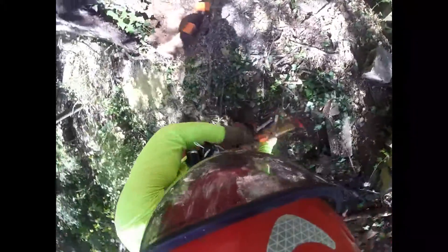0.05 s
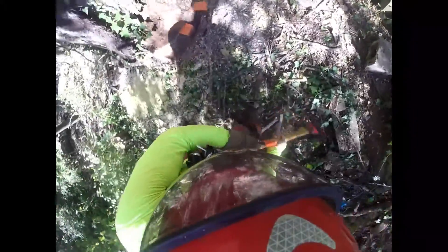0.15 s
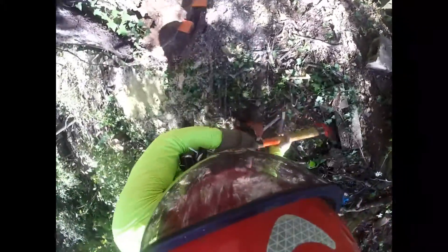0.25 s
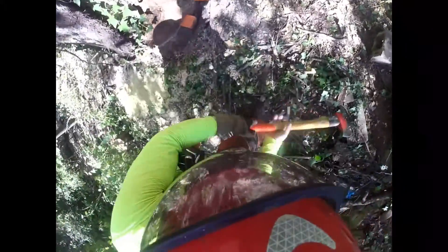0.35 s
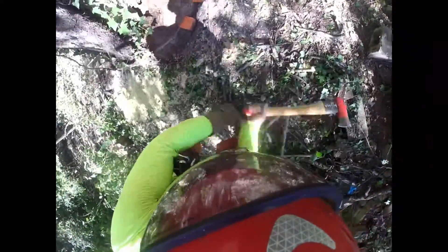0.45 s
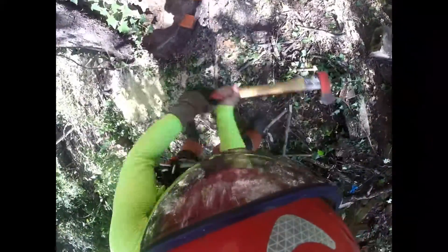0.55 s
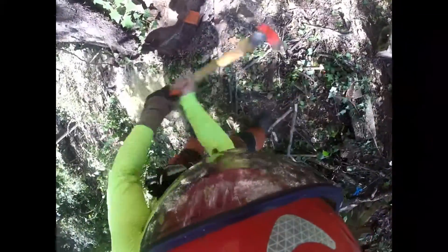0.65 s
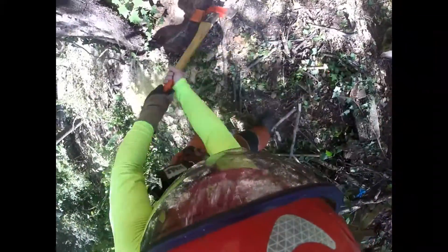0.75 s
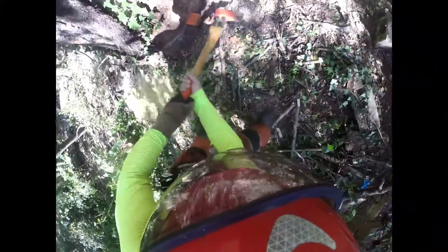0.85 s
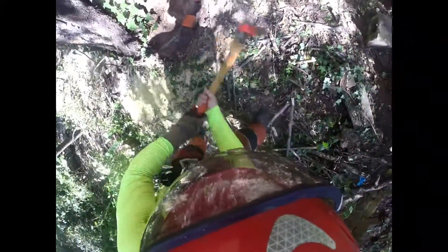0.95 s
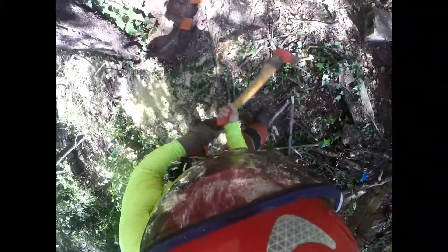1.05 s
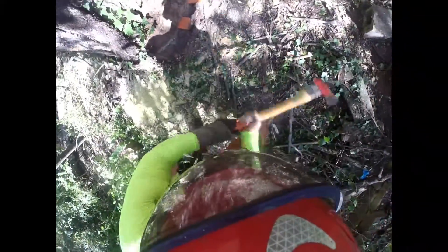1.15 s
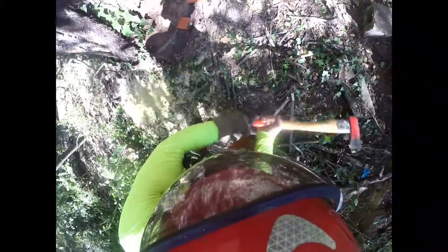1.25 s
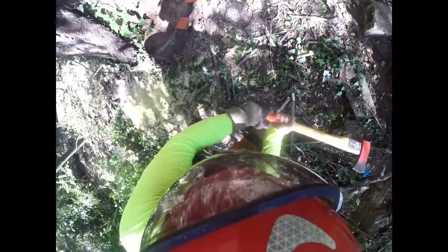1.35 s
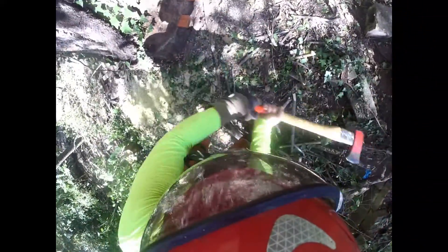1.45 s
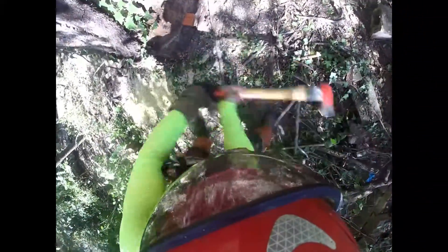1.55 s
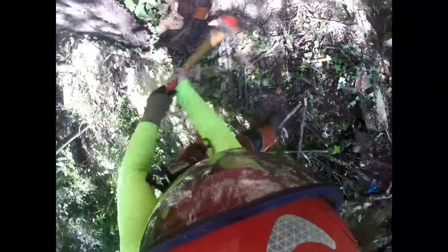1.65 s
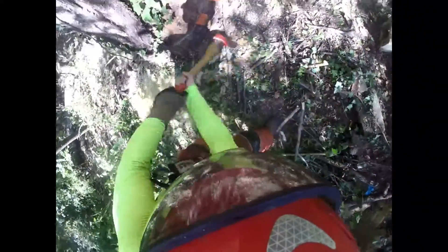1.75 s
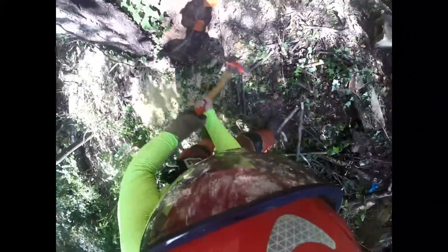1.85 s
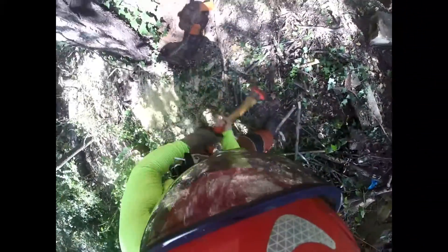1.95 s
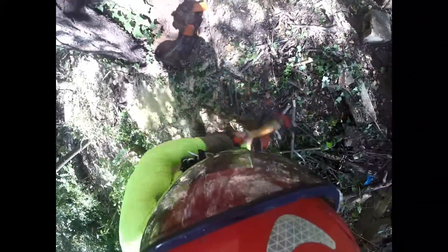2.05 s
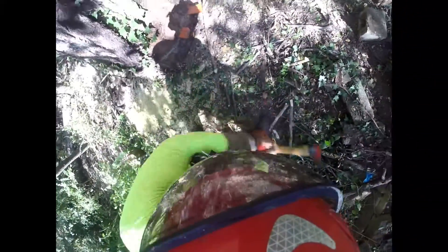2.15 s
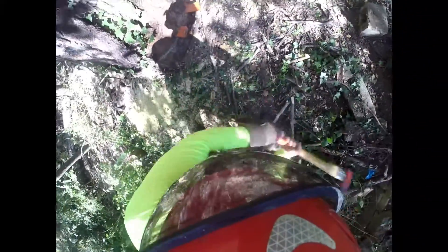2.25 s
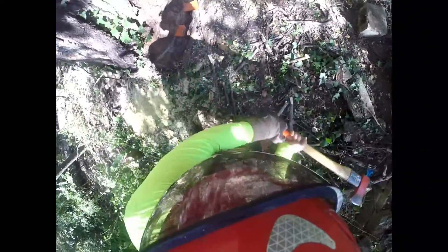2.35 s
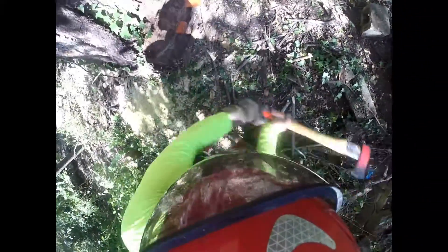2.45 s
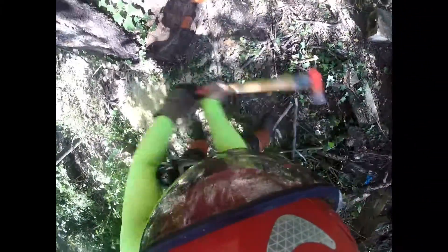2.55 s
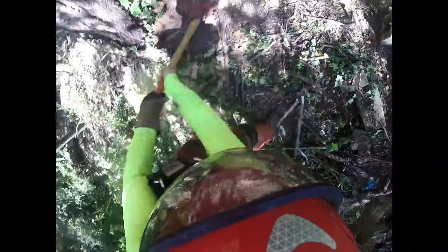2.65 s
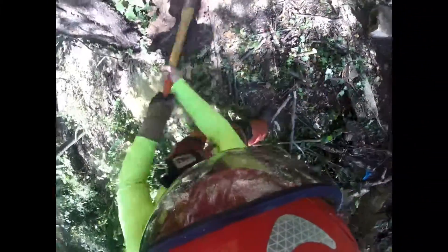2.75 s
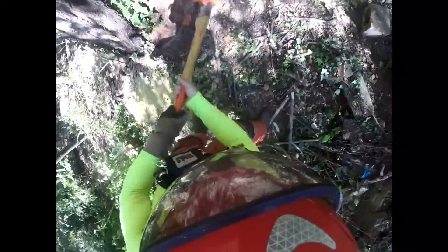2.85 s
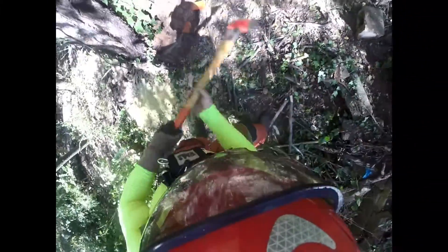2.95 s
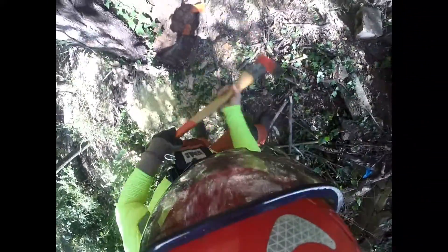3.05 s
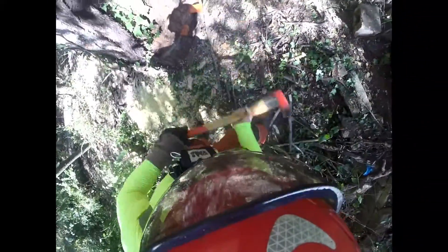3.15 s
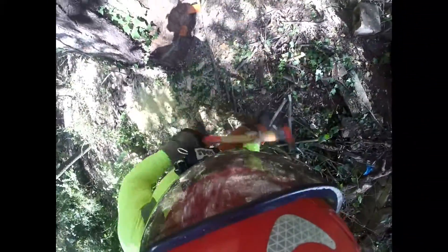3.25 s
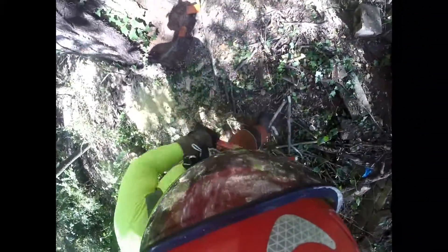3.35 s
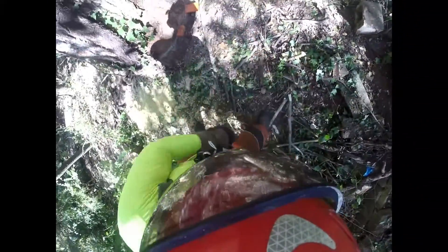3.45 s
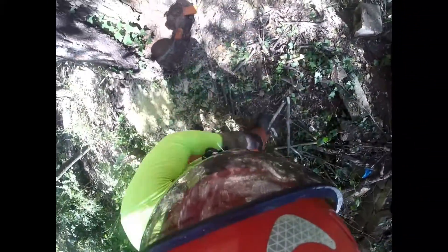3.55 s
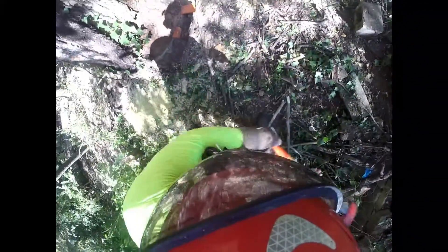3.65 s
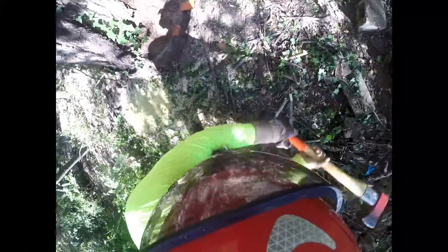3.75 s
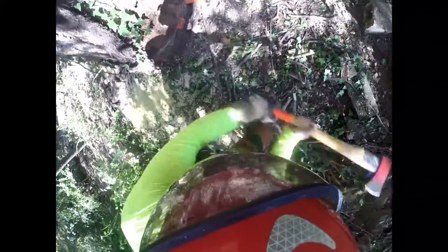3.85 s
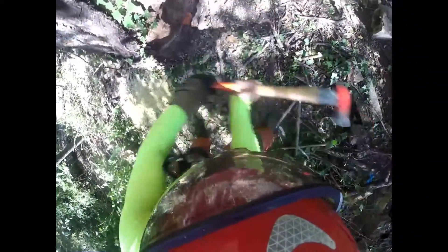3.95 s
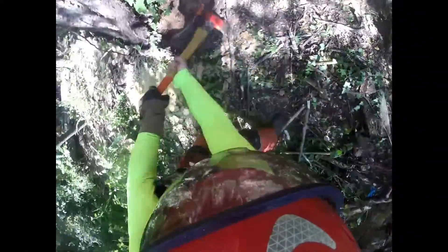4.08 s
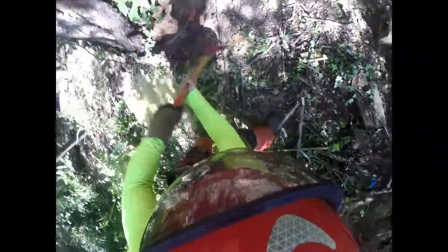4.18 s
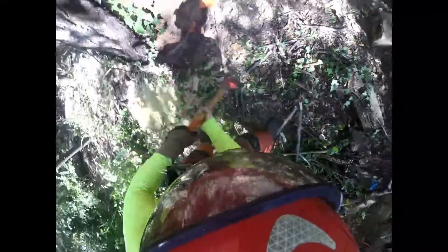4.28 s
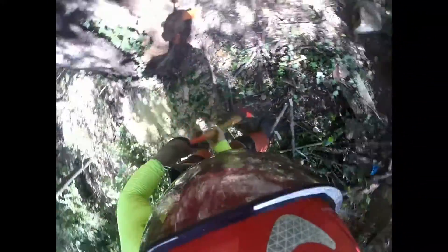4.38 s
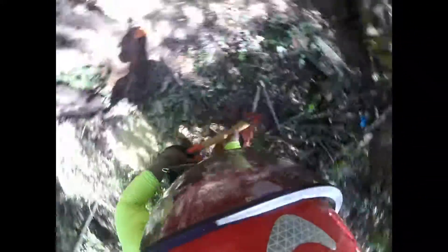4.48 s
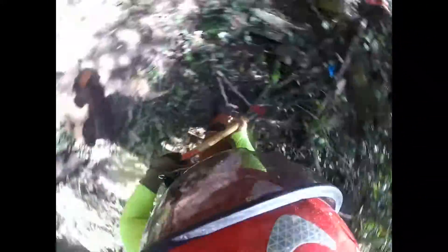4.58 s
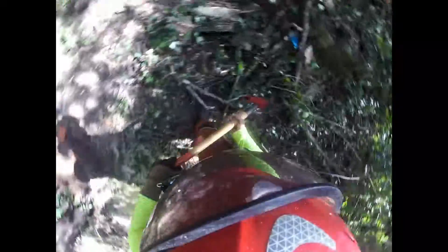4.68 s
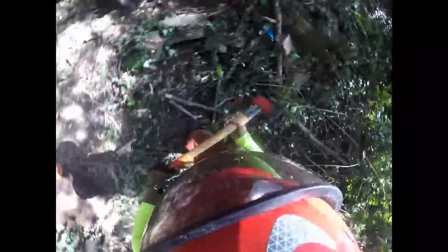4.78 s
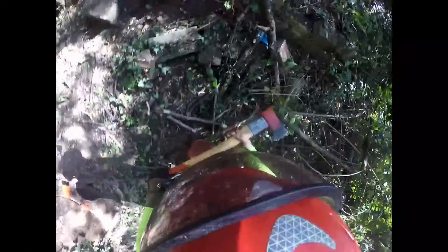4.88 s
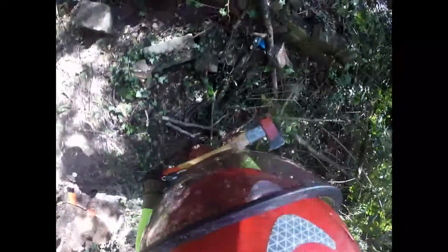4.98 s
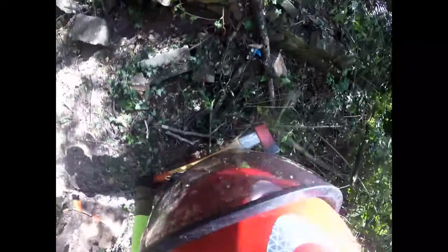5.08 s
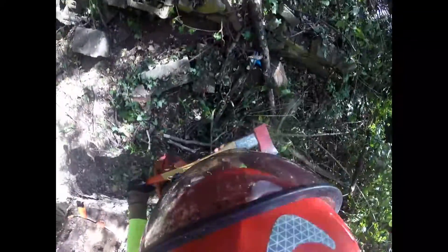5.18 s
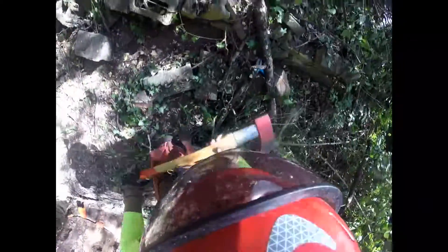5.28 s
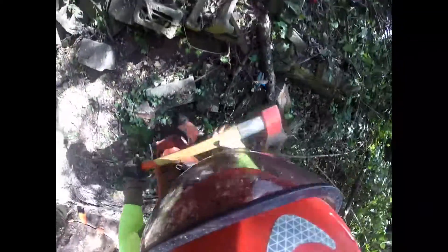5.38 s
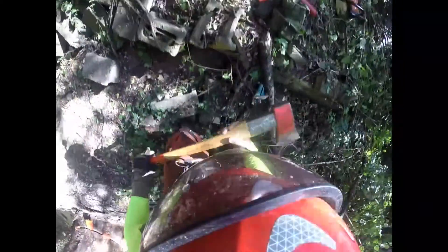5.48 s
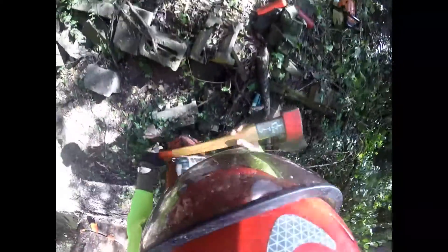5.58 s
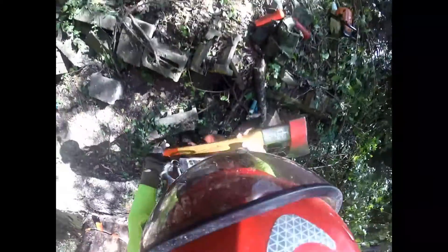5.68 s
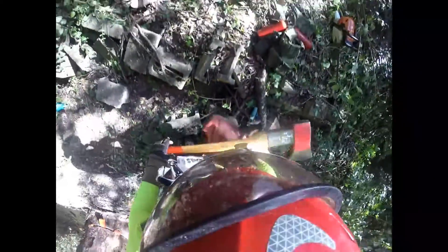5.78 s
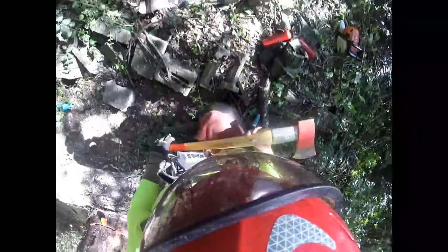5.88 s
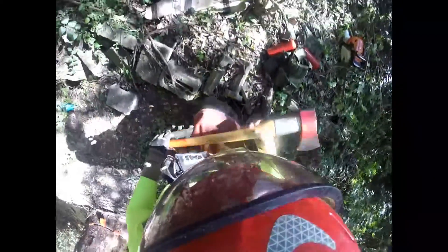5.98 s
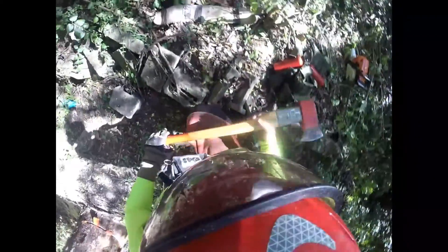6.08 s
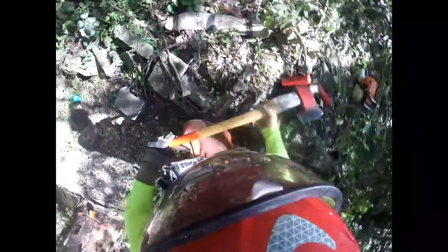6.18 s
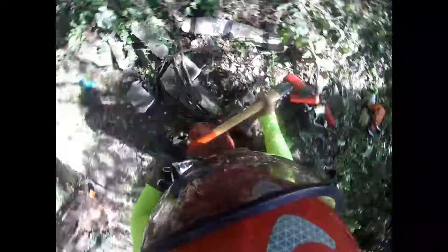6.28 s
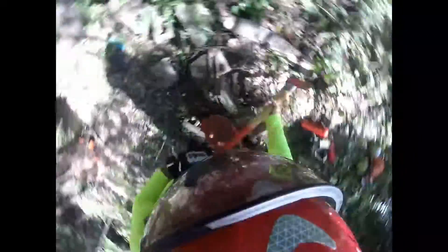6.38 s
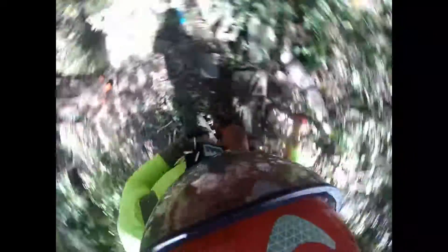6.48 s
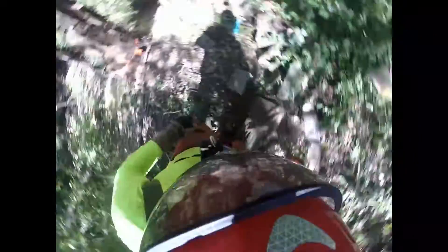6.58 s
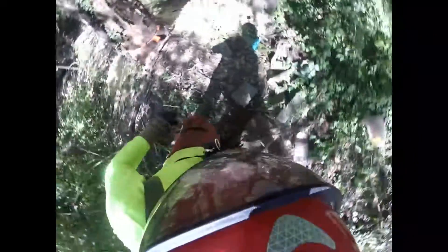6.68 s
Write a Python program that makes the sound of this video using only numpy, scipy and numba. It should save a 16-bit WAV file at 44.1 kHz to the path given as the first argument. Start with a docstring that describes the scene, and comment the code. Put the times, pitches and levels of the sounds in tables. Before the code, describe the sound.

Outdoors among trees, four loud, clipped woody cracks about a second apart, with small bird chirps before and handling bumps and rustling afterwards.

```python
"""Over wavering wind and leaf hush, with a thin insect chorus above, small gear knocks, rustles and chirps open.
Four axe-back blows on a wedge in a trunk follow, at 0.8 to 4.1 s: judder, wood modes, crack noise, tree scatter.
Thin high zips fall between and after them; from 4 s a stir through brush swells in (grain noise) and stays.
Gear knocks, helmet thumps and rustles crowd the end, with one late chirp.
The helmet microphone's input clips, and its limiter ducks everything at each blow."""
import sys
import numpy as np
from scipy import signal
from scipy.fft import rfft, irfft, next_fast_len
from scipy.io import wavfile
from scipy.ndimage import uniform_filter1d, minimum_filter1d
from numba import njit

SR = 44100
rng = np.random.default_rng(int(sys.argv[2]) if len(sys.argv) > 2 else 0)


def inscribe(sig):
    """Save sig as 16-bit PCM at rate SR to the path in sys.argv[1].

    A 1-D sig is mono; a 2-D sig holds one channel per row.
    Samples are clipped to [-1, 1] before scaling.
    """
    pcm = np.round(np.clip(np.atleast_2d(sig).T, -1, 1) * 32767)
    wavfile.write(sys.argv[1], SR, pcm.astype(np.int16))


N = 296352  # 6.72 s


def undb(db):
    """Decibels to gain."""
    return 10 ** (np.asarray(db) / 20)


def unit(x):
    """Scale to rms 1."""
    return x / np.sqrt(np.mean(x ** 2))


def add(out, start_s, x):
    """Mix x into out from start_s."""
    i = max(int(start_s * SR), 0)
    out[i:i + len(x)] += x[:len(out) - i]


def band(x, hz, width_hz):
    """Two-pole band-pass, gain 1 at the centre."""
    return signal.lfilter(*signal.iirpeak(hz, hz / width_hz, SR), x)


def colour(x, points):
    """Filter x to a (Hz, dB) curve, interpolated over log frequency."""
    hz, db = np.transpose(points)
    n = next_fast_len(len(x))
    f = np.arange(n // 2 + 1) * SR / n + 1  # +1 keeps log finite
    gain = undb(np.interp(np.log(f), np.log(hz), db))
    return irfft(rfft(x, n) * gain, n)[:len(x)]


def fade(t, t60_s):
    """Exponential decay, 60 dB in t60_s."""
    return np.exp(-np.log(1000) * t / t60_s)


def walk(rate_hz):
    """Random levels held 1 / rate_hz and smoothed twice; spread near 1."""
    k = int(SR / rate_hz)
    held = np.repeat(rng.standard_normal(N // k + 1), k)
    return 1.3 * uniform_filter1d(uniform_filter1d(held, k), k)[:N]


# axe blows on the wedge: start_s, strength_db, judder_hz, judder_ms (before decay), ring_db (wood over strength)
BLOWS = [(0.7888, 14, 753, 3.63, 2), (1.7418, 20.5, 861, 2.9, -10), (2.7096, 15.5, 717, 4.2, 1),
         (4.12, 18, 671, 3.48, -8)]
# modes of wedge and trunk: pitch_hz, level_db (relative), t60_s (at ring 0 dB)
WOOD_MODES = [(150.2, -9.5, .05), (182.7, -13.5, .05), (262, -11.5, .036), (330, -14, .024),
              (449, -14, .04), (502.4, -8, .06), (639, -14.5, .05), (726, -11.5, .034), (824, -17, 0.067),
              (1007, -6, 0.034)]
# spectrum of the steel crack: freq_hz, level_db (relative)
CRACK_SPECTRUM = [(760, -24.5), (1300, 3), (2200, -11.5), (4080, -7), (4880, -19), (5540, -11.5),
                  (8170, -32.5), (15200, -54.5), (16000, -51.5)]
# returns from big trunks nearby: delay_s, level_db (relative)
ECHOES = [(.058, -39), (.0775, -33), (.085, -43), (.093, -43)]
JUDDER_T60_S = 0.0031  # at ring 0 dB; a deader blow stops sooner
DEAD_DAMPING = 0.084  # dB of mode t60 per dB of ring
CRACK_DB, CRACK_GROWTH = -12.5, 1  # level at strength 0 dB; dB per dB of strength
HAZE_DB, HAZE_GROWTH = -30.5, 0.48  # likewise
SLAP_DB = 5.5


def blows():
    """The wedge judders for a few ms and rings the wood; steel cracks; trunks send back haze and slaps."""
    out, t = np.zeros(N), np.arange(SR // 2) / SR
    for start_s, strength_db, judder_hz, judder_ms, ring_db in BLOWS:
        # judder swells within a cycle, dies fast once the head leaves
        rise = np.clip(t / 0.0009, 0, 1) ** 2
        after_s = np.clip(t - judder_ms / 1000, 0, 1)
        judder_env = rise * fade(after_s, JUDDER_T60_S * undb(ring_db))
        judder = undb(strength_db) * judder_env * np.sin(2 * np.pi * judder_hz * t)

        detune = 1 + 0.035 * rng.standard_normal(len(WOOD_MODES))  # the wedge sits differently each time
        t60_scale = undb(DEAD_DAMPING * ring_db)
        modes = np.zeros(len(t))
        for (hz, level_db, t60_s), ratio in zip(WOOD_MODES, detune):
            modes += undb(level_db) * np.sin(2 * np.pi * hz * ratio * t) * fade(t, t60_s * t60_scale)
        modes *= undb(strength_db + ring_db) * np.clip(t / 0.0033, 0, 1)

        crack_noise = unit(colour(rng.standard_normal(len(t)), CRACK_SPECTRUM))
        crack = undb(CRACK_DB + CRACK_GROWTH * strength_db) * rise * fade(after_s, 0.0039) * crack_noise
        scattered = undb(HAZE_DB + HAZE_GROWTH * strength_db) * haze(t)
        add(out, start_s, judder + modes + crack + scattered)
        for delay_s, echo_db in ECHOES:
            add(out, start_s + delay_s, undb(SLAP_DB + echo_db) * slap(judder + 4.0 * crack))
    # a small source radiates no deep bass
    return signal.sosfilt(signal.butter(2, 95, "high", fs=SR, output="sos"), out)


def slap(knock):
    """A trunk returns the knock thinner, with a short smear from the rough bark."""
    t = np.arange(SR // 50) / SR
    bark = .06 * rng.standard_normal(len(t)) * fade(t, .015)
    bark[0] = 1
    smeared = signal.fftconvolve(knock, bark)
    return 1.09 * band(band(smeared, 766, 310), 766, 310) + .5 * band(smeared, 2540, 820)


# scattered sound by band, short rows the ground close by: centre_hz, width_hz (each of two filters),
# level_db (relative), t60_s
SCATTER = [(151, 270, 4, 0.34), (410, 150, 6.5, 0.2), (741, 710, -7.5, 0.037), (664, 600, -7.5, 0.91),
           (2300, 500, -10.5, 0.56), (2956, 520, -10, 0.5), (4000, 3500, -8.5, 0.55),
           (5650, 3300, -13.5, 0.11), (9000, 17000, -24, 0.11), (231, 247, 18, 0.041),
           (3000, 2000, 12, .04), (5200, 5400, 0.5, 0.0062)]


def haze(t):
    """Sound scattered by many trunks: noise that fades band by band."""
    out = np.zeros(len(t))
    for hz, width_hz, level_db, t60_s in SCATTER:
        noise = rng.standard_normal(len(t))
        part = unit(band(band(noise, hz, width_hz), hz, width_hz))
        out += undb(level_db) * part * fade(t, t60_s)
    return out * np.clip(t / .004, 0, 1)


# gear and handle knocks, plus a stick snapping at 3.97 s: start_s, level_db, pitch_hz, tick_db (dry tick over
# ring)
KNOCKS = [(.093, -29.5, 764, -12), (.169, -35.5, 820, -7), (.45, -22.5, 576, -38), (.548, -17, 600, -40),
          (1.484, -19, 635, -20.5), (1.694, -44, 656, 7.5), (3.784, -34, 397, -10),
          (3.9724, -12, 630, -10.5), (3.9805, -25, 706, -13), (4.061, -26.5, 778, -5.5),
          (5.274, -43, 654, -0.5), (5.295, -27, 463, -26), (5.353, -48, 640, -17), (5.39, -48, 640, 0.5),
          (5.457, -16, 413, -40), (5.504, -29, 710, -8), (5.814, -14, 570, -25.5), (5.836, -23.5, 490, -36),
          (6.05, -25, 590, -40), (6.067, -27, 1016, -32), (6.264, -27.5, 724, -40), (6.494, -34, 656, -9),
          (6.52, -18, 655, -13.5)]
# dull bumps through the helmet: start_s, level_db, t60_s
THUMPS = [(.093, -29, 0.027), (0.468, -25, 0.12), (0.546, -26, .06), (1.692, -34, .04), (3.783, -40, 0.13),
          (5.458, -20, .022), (5.574, -14, 0.0087), (5.836, -34, 0.12), (6.05, -30, 0.039)]
# spectrum of dry ticks and of crisp leaves: freq_hz, level_db (relative)
CRISP_SPECTRUM = [(710, -48), (1200, -6), (1400, -9.5), (2480, 9), (3220, 0), (6230, 1.5), (6870, -4.5),
                  (14700, -23.5), (15500, -26.5), (16000, -72)]
KNOCK_T60_S, TICK_T60_S = 0.019, .022
THUMP_HZ = 140


def knocks():
    """Each knock: a short hollow ring with an overtone and a dry tick; thumps are decaying low sines."""
    out, t = np.zeros(N), np.arange(SR // 8) / SR
    for start_s, level_db, hz, tick_db in KNOCKS:
        tones = np.sin(2 * np.pi * hz * t) + .5 * np.sin(2 * np.pi * 1.4 * hz * t)
        ring = tones * fade(t, KNOCK_T60_S) * np.clip(t / .0012, 0, 1)
        tick = unit(colour(rng.standard_normal(len(t)), CRISP_SPECTRUM)) * fade(t, TICK_T60_S)
        add(out, start_s, undb(level_db) * (ring + undb(tick_db) * tick))
    for start_s, level_db, t60_s in THUMPS:
        add(out, start_s, undb(level_db) * np.sin(2 * np.pi * THUMP_HZ * t) * fade(t, t60_s))
    return out


# clothes and leaves moving: top_s, t60_s, level_db, crisp_db (leaves over cloth)
RUSTLES = [(0.102, .25, -44.5, -4), (0.472, 0.35, -34, -16.5), (.53, 0.28, -47, 2), (1.68, .9, -44, -9),
           (2.658, 0.26, -46.5, -5.5), (3.977, .12, -36.5, -4), (4.861, 0.16, -46.5, -13),
           (5.045, 0.24, -58, 3.5), (5.30, 0.045, -48.5, -6), (5.458, 0.083, -36, -9.5),
           (5.56, 0.68, -49.5, -15), (5.828, 0.11, -42.5, -8), (6.0, 0.12, -49.5, -8), (6.06, .4, -49, -3),
           (6.251, 0.87, -49, -7.5), (6.497, 0.031, -33.5, -13), (6.527, 0.25, -36.5, -0.5)]
RISE_SHARE = 0.16  # a rustle swells in this share of its t60
# turning away through the brush
STIR_FROM_S, STIR_RISE_S, STIR_DB, STIR_CRISP_DB = 3.96, 0.97, -59.5, -6.5


def rustle():
    """Dense grains of uneven size, dull in cloth and crisp in leaves, in swells over a late lasting stir."""
    t = np.arange(N) / SR
    size_db = np.minimum(2.3 * rng.exponential(size=N // 128 + 1), 8)
    grains = rng.standard_normal(N) * undb(size_db.repeat(128)[:N])
    cloth_band = signal.butter(3, [200, 1000], "band", fs=SR, output="sos")
    dull = unit(signal.sosfilt(cloth_band, grains))
    crisp = unit(colour(grains, CRISP_SPECTRUM))

    # a twig or leaf cracks now and then
    snap_on = (rng.random(N // 32 + 1) < .008).repeat(32)[:N]
    snaps = rng.standard_normal(N) * snap_on
    brush = unit(colour(grains + 3 * snaps, CRISP_SPECTRUM))
    stir_level = np.clip((t - STIR_FROM_S) / STIR_RISE_S, 0, 1) * undb(STIR_DB + 2.9 * walk(7))
    out = stir_level * (dull + undb(STIR_CRISP_DB) * brush)

    for top_s, t60_s, level_db, crisp_db in RUSTLES:
        rise = np.clip(1 + (t - top_s) / (RISE_SHARE * t60_s), 0, 1)
        swell = rise * fade(np.clip(t - top_s, 0, 9), t60_s)
        out += swell * undb(level_db) * (dull + undb(crisp_db) * crisp)
    return out


# bird whistles: start_s, length_s, start_hz, end_hz, level_db
CHIRPS = [(0.052, 0.047, 3930, 4090, -51), (0.147, 0.042, 4000, 4440, -51), (0.174, 0.066, 4000, 4240, -53),
          (.178, 0.054, 3580, 3760, -55), (0.297, 0.14, 3730, 3970, -59), (0.311, 0.091, 4420, 4600, -54.5),
          (.45, 0.08, 4730, 4750, -56), (0.499, 0.054, 3780, 3860, -59.5), (.54, 0.057, 4860, 4650, -57),
          (0.601, 0.06, 3950, 4040, -55.5), (0.682, .055, 4720, 4820, -57.5),
          (1.675, .024, 5000, 5600, -55), (2.023, 0.033, 7200, 6660, -54), (2.25, 0.097, 3800, 3745, -57),
          (6.388, .075, 3950, 3880, -56)]


def birds():
    """Short gliding whistles, slightly unsteady, trailing off among the trunks."""
    out = np.zeros(N)
    for start_s, length_s, start_hz, end_hz, level_db in CHIRPS:
        u = np.linspace(0, 1, int(length_s * SR))
        wobble_hz = 500 * uniform_filter1d(rng.standard_normal(len(u)), 300)
        hz = start_hz + (end_hz - start_hz) * np.sqrt(u) + wobble_hz
        hoarse = .75 + 6 * uniform_filter1d(rng.standard_normal(len(u)), 200)
        swell = np.sqrt(np.sin(np.pi * u) + 1e-9)
        whistle = np.sin(2 * np.pi * np.cumsum(hz) / SR)
        add(out, start_s, undb(level_db) * hoarse * swell * whistle)
    t = np.arange(SR // 4) / SR
    trees = rng.standard_normal(len(t)) * fade(t, 0.45)
    return out + undb(-11) * signal.fftconvolve(out, trees / np.linalg.norm(trees))[:N]


# thin high zips: start_s, level_db, pitch_hz, t60_s
ZIPS = [(0.9667, -51, 13600, 0.07), (2.1544, -38.5, 13500, .091), (2.6505, -51, 10820, .04),
        (2.8295, -44, 13100, .12), (4.0582, -48, 10540, 0.051), (4.6009, -51, 13600, .15)]


def zips():
    """Narrow-band noise: thin, rough, very high notes that start sharply and fade."""
    out, t = np.zeros(N), np.arange(SR // 4) / SR
    for start_s, level_db, hz, t60_s in ZIPS:
        note = rng.standard_normal(len(t))
        for _ in range(3):
            note = band(note, hz, 600)
        add(out, start_s, undb(level_db) * unit(note) * fade(t, t60_s))
    return out


# spectrum of wind and far leaves: freq_hz, level_db (relative)
HUSH_SPECTRUM = [(12, -27), (22, 0.5), (58, 5), (85, -1.5), (130, 0), (250, -5.5), (400, -4.5), (850, -8),
                 (1150, -22), (1500, -20.5), (2900, -23), (3500, -26), (6300, -31.5), (8600, -40),
                 (13000, -47.5), (16000, -73.5)]
HUSH_DB = -44.5
INSECT_HZ, INSECT_WIDTH_HZ, INSECT_DB = 7400, 650, -69  # width of each of two filters


def hush():
    """Wind bass and far-leaf treble: one noise split at 120 Hz, each part wavering; insects in a narrow band."""
    air = unit(colour(rng.standard_normal(N), HUSH_SPECTRUM))
    bass = signal.lfilter(*signal.butter(1, 120, fs=SR), air)
    leaves = undb(0.63 * walk(4.6) + 2.2 * walk(12)) * (air - bass)
    wind = undb(0.9 * walk(5.0)) * bass
    insects = band(rng.standard_normal(N), INSECT_HZ, INSECT_WIDTH_HZ)
    insects = unit(band(insects, INSECT_HZ, INSECT_WIDTH_HZ))
    return undb(HUSH_DB) * (leaves + wind) + undb(INSECT_DB + 0.81 * walk(8.2)) * insects


def scene():
    """All sources at one microphone."""
    return (blows() + knocks() + rustle() + birds() + zips() + hush())[None]


@njit
def recover(want_db, hold_samples, step_db):
    """Gain drops at once, waits, then climbs back at a steady rate."""
    out, gain_db, wait = np.empty(len(want_db)), 0., 0.
    for i in range(len(want_db)):
        if want_db[i] <= gain_db:
            gain_db, wait = want_db[i], hold_samples
        elif wait > 0:
            wait -= 1
        else:
            gain_db = min(gain_db + step_db, want_db[i])
        out[i] = gain_db
    return out


CLIP_DB, TOP_HZ = 16, 15600
LOOK_S, HOLD_S, RISE_DB_S = .014, 0.069, 16


def record(dry):
    """The input clips; a look-ahead limiter ducks before each peak and recovers slowly; the top is cut."""
    x = np.clip(dry[0], -undb(CLIP_DB), undb(CLIP_DB))
    look = int(LOOK_S * SR)
    want_db = np.minimum(-20 * np.log10(np.abs(x) + 1e-9), 0)
    want_db = minimum_filter1d(want_db, 2 * look + 1)
    gain_db = uniform_filter1d(recover(want_db, HOLD_S * SR, RISE_DB_S / SR), 64)
    top_cut = signal.ellip(8, .2, 70, TOP_HZ, fs=SR, output="sos")
    return signal.sosfilt(top_cut, x * undb(gain_db))[None]


dry = scene()
out = record(dry)
inscribe(out)
```